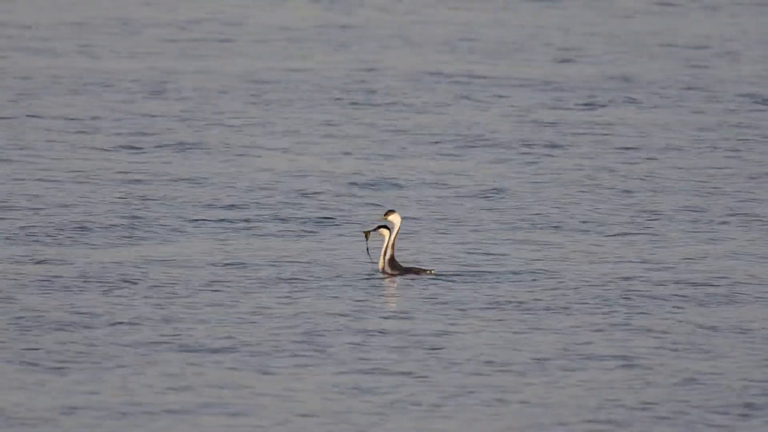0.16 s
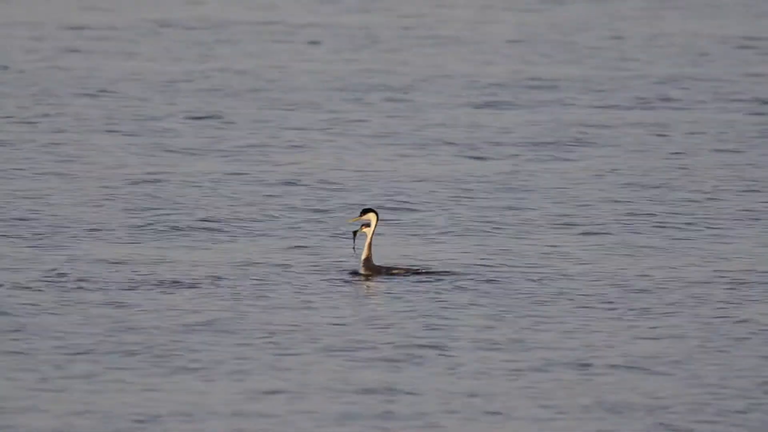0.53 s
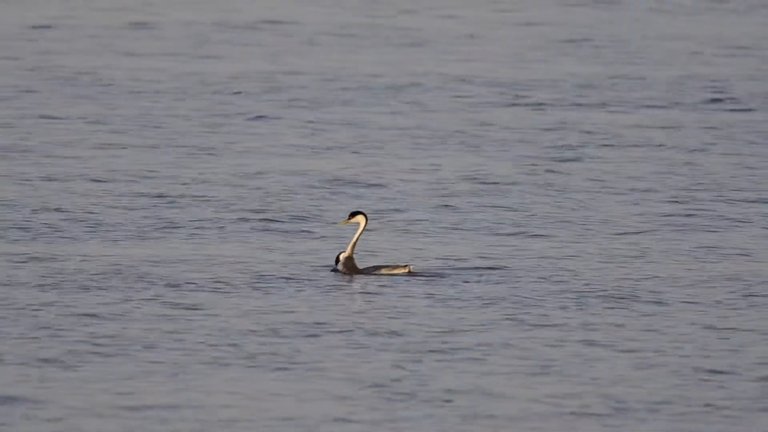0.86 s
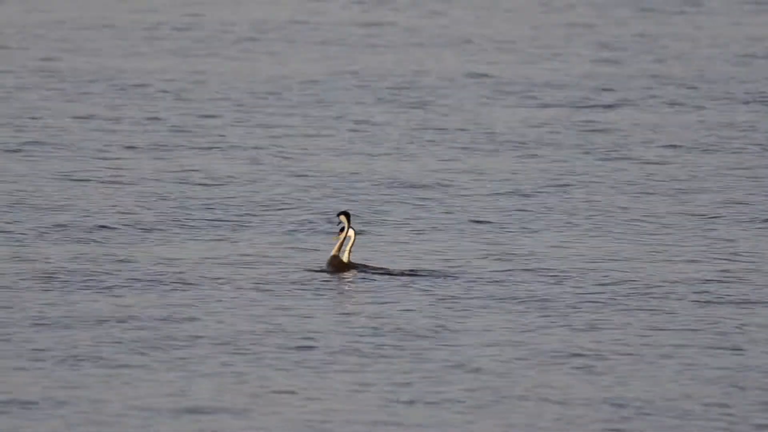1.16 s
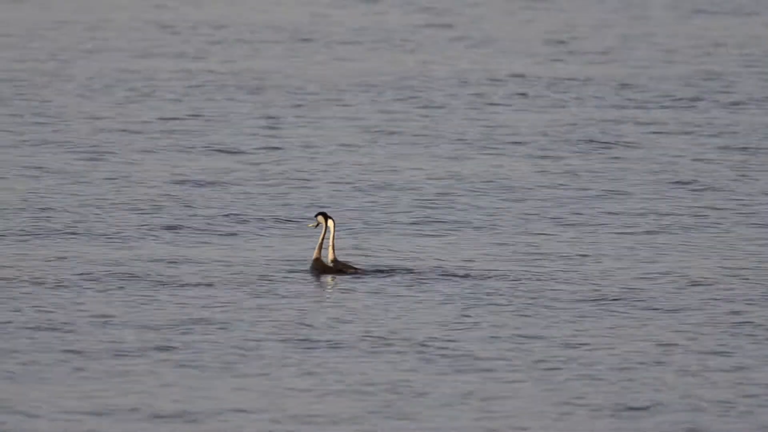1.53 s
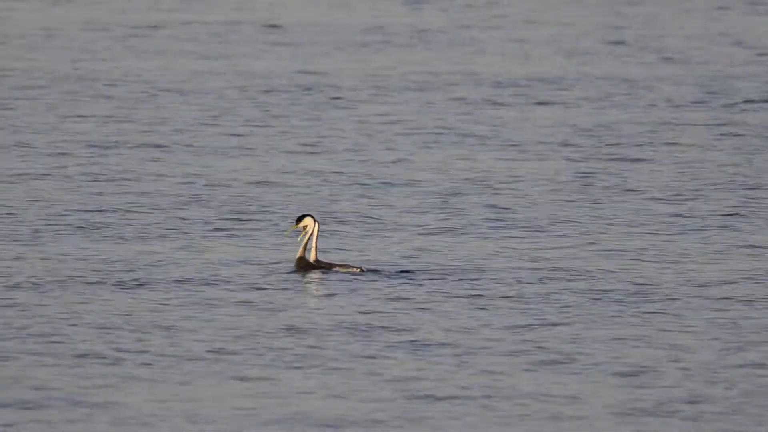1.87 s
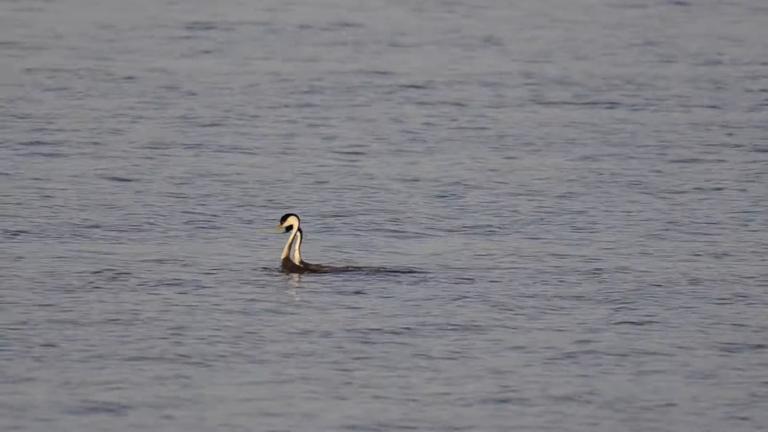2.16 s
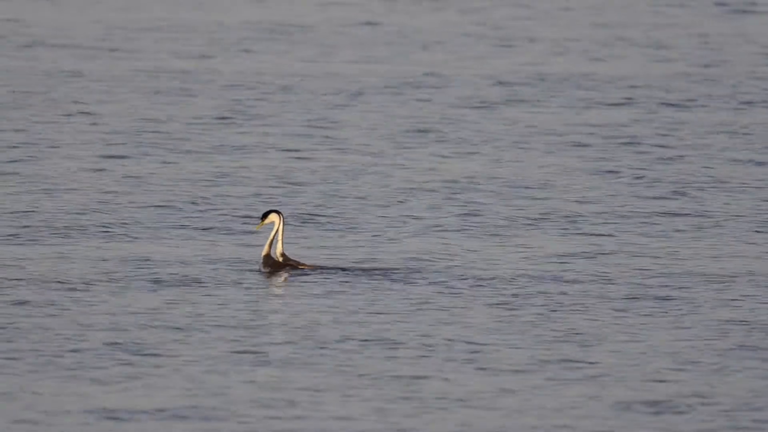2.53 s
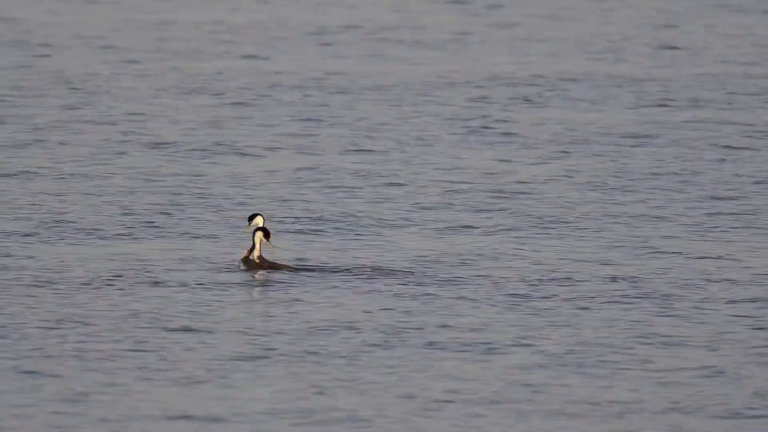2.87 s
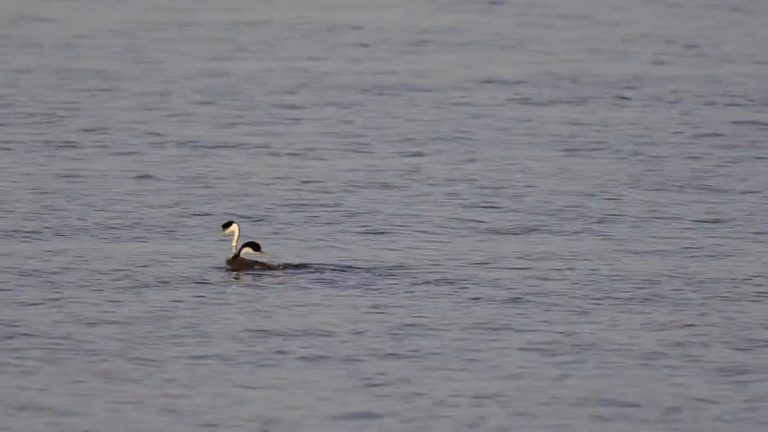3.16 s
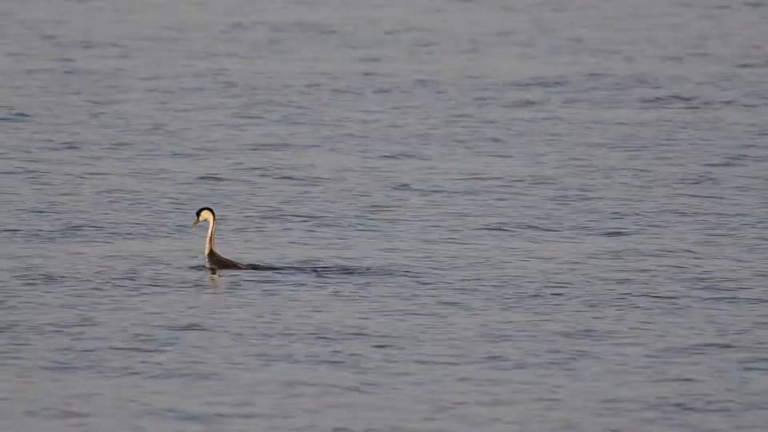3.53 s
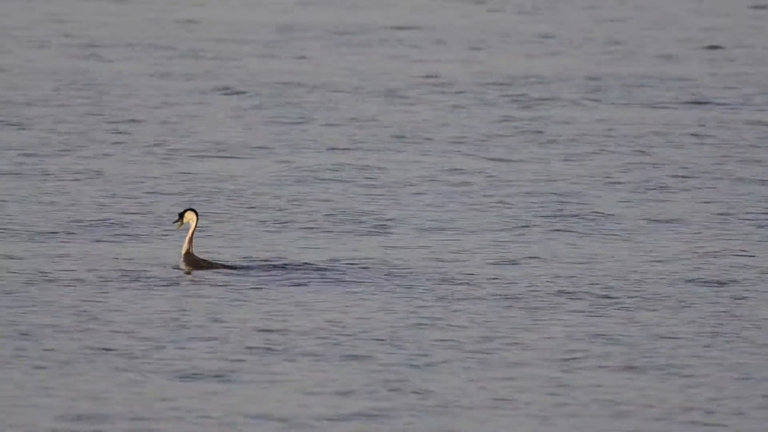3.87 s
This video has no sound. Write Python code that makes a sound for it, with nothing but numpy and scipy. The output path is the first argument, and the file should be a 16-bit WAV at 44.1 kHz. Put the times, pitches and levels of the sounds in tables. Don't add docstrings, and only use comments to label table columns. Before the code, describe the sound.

Grebe calls, a dry clicking rattle and small fluttering whistles, carry over a windy open lake.

```python
import sys
import numpy as np
from scipy import signal
from scipy.io import wavfile
from scipy.ndimage import uniform_filter1d

SR = 44100
rng = np.random.default_rng(int(sys.argv[2]) if len(sys.argv) > 2 else 0)


def transcribe(signal):
    frames = np.atleast_2d(signal).T
    limited = np.clip(frames, -1, 1)
    pcm = np.round(limited * 32767).astype(np.int16)
    wavfile.write(sys.argv[1], SR, pcm)


def nominal_scale(level):
    x = np.asarray(level, float) / 20
    return 10 ** x


N = 176400

# (frequency [Hz], level per Hz [dB])
TOWN_SPECTRUM = [(76, -39), (130, -7.5), (571, -3.5), (741, -7), (1410, -9), (2410, -14), (2670, -17),
                 (5590, -24.5), (15500, -45.5)]
# (time [s], length [s], rms level [dB])
GUST_EVENTS = [
    (0.19, .14, -51.5),
    (0.363, 0.17, -50),
    (1.515, 0.283, -48.5),
    (1.95, 0.093, -60),
    (2.33, 0.095, -55),
    (3.096, 0.25, -58),
    (3.287, 0.18, -44.5),
    (3.695, 0.37, -43.5),
]
# (time [s], peak level [dB], pitch [Hz])
THUMP_EVENTS = [
    (.21, -37.5, 70),
    (0.47, -40.5, 65.7),
    (1.592, -40, 70),
    (1.806, -40.5, 128),
    (3.342, -29.5, 120),
    (3.419, -33.5, 88),
    (3.741, -27, 124),
    (3.778, -31, 128),
    (3.816, -31.5, 230),
    (3.94, -24.5, 91.5),
]
# (time [s], length [s], rms level [dB])
FIZZ_EVENTS = [
    (.8, 0.22, -63.5),
    (0.963, 0.0416, -61.5),
    (1.351, 0.203, -56.5),
]
# (time [s], peak level [dB], pitch [Hz])
TICK_EVENTS = [
    (0.12, -35, 4800),
    (2.123, -41.5, 3170),
    (2.212, -46, 5900),
    (2.524, -40, 6100),
    (.025, -37, 800),
]
# (time [s], length [s], peak level [dB])
FALLING = [(0.04, 0.028, -36), (.183, 0.032, -34), (0.42, 0.031, -32), (0.556, 0.033, -31.5),
           (0.707, 0.027, -33), (0.946, 0.041, -33), (1.092, 0.03, -34), (1.296, 0.036, -35),
           (1.444, 0.036, -33), (1.668, 0.037, -33), (1.823, 0.024, -36), (1.984, 0.02, -38.5),
           (2.249, .014, -41)]
# (time [s], length [s], peak level [dB], start pitch [Hz], end pitch [Hz])
RISING = [
    (0.868, 0.0347, -31.5, 2290, 3310),
    (0.621, 0.027, -33.5, 1750, 2940),
    (1.224, 0.018, -33.5, 2300, 3330),
    (1.371, 0.023, -34.5, 1950, 2750),
    (1.594, 0.021, -31, 2240, 3440),
    (1.743, 0.025, -36, 1900, 3180),
    (1.909, 0.0204, -35, 2000, 3190),
    (2.173, 0.024, -34, 1970, 3450),
    (2.318, 0.023, -34.5, 2080, 2785),
]
# (time [s], length [s], peak level [dB], start pitch [Hz], end pitch [Hz])
SLURRED = [
    (0.459, 0.051, -44, 1936, 2370),
    (0.991, 0.054, -45.5, 1620, 2610),
    (2.484, .035, -49.5, 1686, 2180),
    (2.519, 0.027, -49, 2150, 1494),
]
# (time [s], peak level [dB], pitch [Hz], half width [ms])
OPENING_PIPS = [(0.1001, -31, 2450.0, 1), (0.1067, -19.5, 2250, 0.57), (0.1097, -22, 2296, 0.5),
                (0.1114, -19, 2290, 0.55), (0.1134, -19, 2480, 0.87), (0.1172, -26.7, 2510, 1.0),
                (0.1193, -34, 2580, 0.47), (0.1228, -21, 2540, 0.36), (0.1318, -36.5, 3150, 1.3),
                (0.142, -35, 2200, 0.41), (0.231, -19, 2720, 0.79), (0.2353, -35, 2730, 1.5),
                (0.2391, -20, 2710, 0.86), (0.2476, -27, 2620.0, 1.3), (0.2573, -17.5, 2550, 0.66),
                (0.2606, -33, 2450.0, 0.53), (0.2656, -16.5, 2610, 0.48), (0.2674, -24, 2540, 0.58),
                (0.2692, -25, 2660, 0.47), (0.2753, -26, 2585, 0.36), (0.2784, -32.6, 2740, 0.93),
                (0.2849, -21.3, 2560, 0.42), (0.2876, -34, 2440, 0.7), (0.2955, -19, 2627, 1.1),
                (0.3055, -21, 2740, 0.49), (0.3455, -33, 2330, 0.66), (0.3515, -31, 2660, 0.77),
                (0.3566, -28.5, 2940.0, 0.47), (0.3618, -34, 3100, 0.7), (0.3675, -38, 2900, 0.6)]
LATER_PIPS = [(3.0973, -17, 2072, 0.71), (3.1, -17.7, 2226, 1.01), (3.1027, -18.5, 2184, 1.2),
              (3.1069, -13.5, 2333, 1.07), (3.1106, -13.5, 2450.0, 0.83), (3.12, -18.5, 2420.0, 1.1),
              (3.1473, -15, 2254, 0.89), (3.1484, -23, 2370, 0.21), (3.151, -18.5, 2140, 0.81),
              (3.154, -31.4, 2300.0, 0.43), (3.1691, -14, 2410, 0.63), (3.171, -30, 2475, 0.92),
              (3.1743, -41, 2440, 0.98), (3.1944, -13.5, 2365, 0.7), (3.2135, -18.5, 2276, 0.44),
              (3.4612, -13, 2470, 0.74), (3.4645, -15, 2450.0, 1.3), (3.4703, -37, 2360.0, 0.89),
              (3.493, -23.5, 1910, 0.41), (3.5311, -10, 2292, 0.93), (3.5339, -11.5, 2410, 1.1),
              (3.538, -12, 2580, 0.91), (3.5414, -28, 2560, 0.7), (3.5463, -38, 2450, 0.86),
              (3.5748, -23, 2060, 0.52), (3.5885, -24, 2084, 0.26), (3.5926, -22, 2140, 0.79),
              (3.616, -32, 2620, 0.65), (3.909, -29.5, 2300, 0.8), (3.9371, -27.5, 2340, 0.62)]
LONG_RATTLE_PIPS = [(3.6426, -16.5, 2170, 0.66), (3.6443, -31, 2240, 0.78), (3.6477, -17.5, 2324, 0.58),
                    (3.6498, -31, 2280, 0.6), (3.657, -29, 2520.0, 0.7), (3.6623, -11.5, 2450.0, 0.94),
                    (3.666, -11, 2345, 1.2), (3.669, -10.5, 2470, 1.08), (3.6733, -25, 2430, 0.8),
                    (3.6796, -10, 2430.0, 1.15), (3.6847, -34, 2340, 0.77), (3.6929, -10.5, 2440.0, 0.83),
                    (3.6946, -25, 2395, 1.2), (3.6987, -34, 2300, 0.4), (3.7114, -27, 2550, 0.37),
                    (3.7162, -11.5, 2484, 0.87), (3.7211, -10.5, 2450.0, 1.1), (3.725, -9.5, 2530, 0.93),
                    (3.729, -31, 2490.0, 1.18), (3.735, -15, 2405, 1), (3.7388, -39, 2370.0, 0.71),
                    (3.7462, -11.5, 2520.0, 0.84), (3.7508, -13, 2530, 0.85), (3.755, -13, 2446, 0.85),
                    (3.758, -25, 2450.0, 0.3), (3.768, -28.0, 2640.0, 0.74), (3.773, -22, 2200, 0.48),
                    (3.7755, -10, 2430, 0.85), (3.7783, -26, 2480, 0.79), (3.7861, -11.5, 2600.0, 0.56),
                    (3.7882, -27, 2570, 0.69), (3.7906, -21, 2560, 0.74), (3.7942, -13, 2484, 0.89),
                    (3.7978, -24.3, 2430, 0.79), (3.8, -32.5, 2500, 0.63), (3.8045, -20, 2450.0, 0.61),
                    (3.8073, -18.5, 2530, 0.54), (3.8096, -38, 2560.0, 0.57)]
# (time [s], peak level [dB], pitch [Hz], half width [ms])
STRAY_PIP = (3.88, -32, 2258, .6)
# (time [s], pitch [Hz], rms level [dB])
HELD_NOTES = [
    [(.217, 2460, -42), (.222, 2460, -25), (.2285, 2590, -21.5)],
    [(3.444, 1954, -32), (3.4475, 2216, -16), (3.4495, 2206, -22), (3.456, 2294, -14.5),
     (3.4595, 2430, -22.5)],
    [(3.518, 1534, -35.5), (3.529, 1677, -24.5)],
    [(3.594, 2030, -23.5), (3.601, 2100, -21.5), (3.606, 2122, -19.5), (3.61, 2340, -15.5),
     (3.6135, 2680, -16)],
]
# (time from [s], octave gain [dB], higher overtone gain [dB])
BILL_OPENING = [
    (0, 3.5, -8),
    (.2, -5.5, -11),
    (3.0, -2, -3),
    (3.4, 0.2, 2),
    (3.635, -2.5, -2.5),
]
OVERTONE_LEVELS = [-1.5, -5.5, -10.5]
# (frequency [Hz], width [Hz], depth [0-1])
MIC_NOTCHES = [
    (5664, 790, 0.9),
    (6940, 210, 1),
]

TOWN_DB, CALM_DB = -47.5, -60.5
THUMP_CYCLES = 0.43
FIZZ_HZ, FIZZ_WIDTH_HZ = 6850, 5500
TICK_CYCLES, TICK_SNAP_DB = 8, 8
FALL_TOP_HZ, FALL_END_HZ, FALL_BEND = 2940, 1750, 1.1
FALL_PEAK, FALL_FADE_DB, FLUTTER = 0.09, 18.5, 0.25
HOOK_HZ, HOOK_S = 767, 0.00204
RISE_TRILL_HZ, RISE_TRILL, RISE_BEND = 189, 0.15, 0.8
WHISTLE_OCTAVE_DB, SLUR_OCTAVE_DB, OCTAVE_UNDER_HZ = -1, 2.5, 2750
WOBBLE, ROUGH_DB = 0.02, 1.6
PIP_RISE, PIP_FALL, PIP_SCOOP = 0.79, 1.06, 0.05
NOTE_EDGE_S = 0.0012
THROAT_HZ, THROAT_WIDTH_HZ, THROAT_STEEP = 2450, 940, 1.51
RASP_DB = -17
LOUD_DB, BRIGHTEN = -12.5, 0.27
RING_DB, RING_WIDTH_HZ, RING_LATE_S = -6.5, 170, 0.001783
ECHO_DB, ECHO_T60_S, AIR_HZ = -14.5, 0.033, 9360
AGC_DB, AGC_SHARE, AGC_S = -36, 0.19, 0.28


def band(x, hz, width_hz):
    return signal.lfilter(*signal.iirpeak(min(hz, .45 * SR), hz / width_hz, fs=SR), x)


def noise():
    return rng.standard_normal(N)


def unit(x):
    return x / np.sqrt(np.mean(x ** 2))


def walk(rate):
    k = int(SR / rate)
    steps = np.repeat(rng.standard_normal(N // k + 1), k)
    return 1.5 * uniform_filter1d(uniform_filter1d(steps, k), k)[:N]


def add(out, start_s, x):
    i = max(int(start_s * SR), 0)
    out[i:i + len(x)] += x[:N - i]


def town():
    out, swell = 0, walk(0.75)
    spectrum_hz, spectrum_db = np.transpose(TOWN_SPECTRUM)
    for hz in 150 * 2 ** np.arange(0, 7, .5):
        db = np.interp(np.log(hz), np.log(spectrum_hz), spectrum_db)
        db = db + .5 * swell + .7 * walk(9)
        out = out + nominal_scale(db) * band(band(noise(), hz, hz / 1.5), hz, hz / 1.5)
    return unit(out) * nominal_scale(TOWN_DB)


def wind():
    size = np.full(N, nominal_scale(CALM_DB))
    for s, length, db in GUST_EVENTS:
        arch = np.abs(np.sin(np.linspace(0, np.pi, int(length * SR))))
        add(size, s, nominal_scale(db) * arch ** 0.63)
    lumpy = noise() * nominal_scale(3.06 * walk(60))
    out = unit(band(band(lumpy, 46, 76), 58, 280)) * size
    for s, db, hz in THUMP_EVENTS:
        cycles = np.arange(-2, 2, hz / SR)
        swing = np.cos(2 * np.pi * cycles) * np.exp(-.5 * (cycles / THUMP_CYCLES) ** 2)
        add(out, s - 2 / hz, -nominal_scale(db) * swing)
    return out


def water():
    out = np.zeros(N)
    grains = noise() * nominal_scale(0.85 * walk(300))
    fizz = unit(band(band(grains, FIZZ_HZ, FIZZ_WIDTH_HZ), FIZZ_HZ, FIZZ_WIDTH_HZ))
    for s, length, db in FIZZ_EVENTS:
        u = np.linspace(0, 1, int(length * SR))
        shape = u ** 0.24 * np.clip(8 - 8 * u, 0, 1)
        add(out, s, nominal_scale(db) * shape * fizz[int(s * SR):][:len(u)])
    for s, db, hz in TICK_EVENTS:
        cycles = np.arange(0, 5 * TICK_CYCLES, hz / SR)
        snap = nominal_scale(TICK_SNAP_DB) * band(band(rng.standard_normal(len(cycles)), hz, hz / 2), hz, hz)
        decay = np.clip(cycles, 0, 1) * np.exp(-cycles / TICK_CYCLES)
        add(out, s, nominal_scale(db) * decay * (np.sin(2 * np.pi * cycles) + snap))
    return out


def throat(hz):
    detune = (hz / THROAT_HZ - THROAT_HZ / hz) * THROAT_HZ / THROAT_WIDTH_HZ
    return (1 + detune ** 2) ** (-THROAT_STEEP / 2)


def whistle(out, s, hz, size, octave_db, wobble, rough):
    i = slice(int(s * SR), int(s * SR) + len(hz))
    phase = 2 * np.pi * np.cumsum(hz * (1 + WOBBLE * wobble[i])) / SR
    octave = nominal_scale(octave_db) * throat(2 * hz) * (hz < OCTAVE_UNDER_HZ) * np.sin(2 * phase)
    add(out, s, size * nominal_scale(ROUGH_DB * rough[i]) * (np.sin(phase) + octave))


def piper():
    out, chance = np.zeros(N), (walk(400), walk(300))
    for s, length, db in FALLING:
        u = np.linspace(0, 1, int(length * SR))
        drop_hz = (FALL_TOP_HZ - FALL_END_HZ) * min(length / .03, 1)
        hook_hz = HOOK_HZ * min(length / 0.0317, 1) ** 2 * np.exp(-u * length / HOOK_S)
        hz = FALL_END_HZ + drop_hz * (1 - u ** FALL_BEND) + hook_hz
        fade = nominal_scale(db - FALL_FADE_DB * np.clip(u - .16, 0, 1) ** 1.35)
        flutter = 1 - FLUTTER * np.cos(2 * np.pi * RISE_TRILL_HZ * length * u)
        size = np.clip(u / FALL_PEAK, 0, 1) * fade * flutter * np.clip(10 - 10 * u, 0, 1)
        whistle(out, s, hz, size, WHISTLE_OCTAVE_DB, *chance)
    for s, length, db, from_hz, to_hz in RISING:
        u = np.linspace(0, 1, int(length * SR))
        beat = RISE_TRILL_HZ * length * u % 1 / RISE_TRILL
        pulse = np.e * beat * np.exp(-beat)
        hz = from_hz + (to_hz - from_hz) * u ** RISE_BEND
        hz = hz * (1 + PIP_SCOOP * np.tanh(beat - 1))
        size = nominal_scale(db) * np.abs(np.sin(np.pi * u ** 0.6)) ** 0.58 * pulse
        whistle(out, s, hz, size, 2 * WHISTLE_OCTAVE_DB - 10, *chance)
    for s, length, db, from_hz, to_hz in SLURRED:
        u = np.linspace(0, 1, int(length * SR))
        size = nominal_scale(db) * np.abs(np.sin(np.pi * u)) ** 0.093
        octave_db = SLUR_OCTAVE_DB + db - SLURRED[0][2]
        whistle(out, s, from_hz + (to_hz - from_hz) * u, size, octave_db, *chance)
    return out


def voice(s, hz, size):
    phase = 2 * np.pi * np.cumsum(hz) / SR
    _, octave_db, upper_db = [row for row in BILL_OPENING if row[0] <= s][-1]
    effort = (size / nominal_scale(LOUD_DB)) ** BRIGHTEN
    tone = np.sin(phase)
    for k, db in enumerate(OVERTONE_LEVELS):
        gain = nominal_scale(db + (upper_db if k else octave_db)) * effort
        tone = tone + gain * throat((k + 2) * hz) / throat(hz) * np.sin((k + 2) * phase)
    breath = band(rng.standard_normal(len(hz)), THROAT_HZ, THROAT_HZ)
    return size * (tone + nominal_scale(RASP_DB) * band(breath, 2600, 2400))


def grebe():
    out, t = np.zeros(N), np.arange(-250, 250) / SR
    for s, db, hz, ms in [*OPENING_PIPS, *LATER_PIPS, *LONG_RATTLE_PIPS, STRAY_PIP]:
        u = t / (ms * .001)
        shape = np.exp(-.5 * (u / np.where(t < 0, PIP_RISE, PIP_FALL)) ** 2)
        scooped_hz = hz * (1 + PIP_SCOOP * np.tanh(u / 2))
        add(out, s + t[0], voice(s, scooped_hz, nominal_scale(db) * shape))
    for note in HELD_NOTES:
        s, hz, db = np.array(note).T
        u = np.arange(s[0], s[-1] + NOTE_EDGE_S, 1 / SR)
        edge = np.clip(np.minimum(u - u[0], u[-1] - u) / NOTE_EDGE_S, 0, 1)
        size = np.sqrt(2) * edge * nominal_scale(np.interp(u, s, db))
        add(out, s[0], voice(s[0], np.interp(u, s, hz), size))
    ring = band(out, THROAT_HZ, RING_WIDTH_HZ)
    return out + nominal_scale(RING_DB) * np.roll(ring, int(RING_LATE_S * SR))


def lake(x):
    t = np.arange(int(.06 * SR)) / SR
    echo = rng.standard_normal(len(t)) * nominal_scale(-60 * t / ECHO_T60_S) * np.clip(t / 0.0032, 0, 1)
    echo = echo / np.sqrt(np.sum(echo ** 2))
    x = x + nominal_scale(ECHO_DB) * signal.fftconvolve(band(x, THROAT_HZ, THROAT_HZ), echo)[:N]
    return signal.sosfilt(signal.butter(4, AIR_HZ, fs=SR, output="sos"), x)


def scene():
    return (town() + wind() + water() + lake(piper() + grebe()))[None]


def top_cut(x):
    return signal.sosfilt(signal.butter(12, 15800, fs=SR, output="sos"), x)


def record(dry):
    x = dry[0]
    for hz, width_hz, depth in MIC_NOTCHES:
        x = x - min(depth, 1) * band(x, hz, width_hz)
    x = signal.sosfilt(signal.ellip(8, .2, 70, 15750, fs=SR, output="sos"), x)
    keep = np.exp(-1 / (AGC_S * SR))
    power = signal.lfilter([1 - keep], [1, -keep], x ** 2)
    gain = (1 + power / nominal_scale(AGC_DB) ** 2) ** (-AGC_SHARE / 2)
    return top_cut((x * gain)[None])


dry = scene()
out = record(dry)
transcribe(out)
```